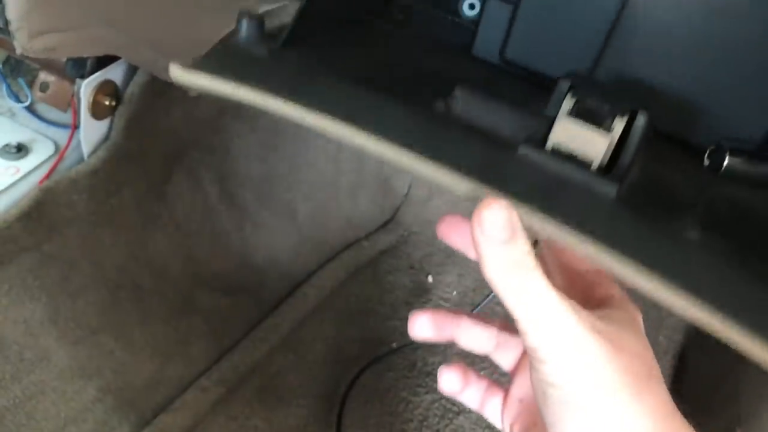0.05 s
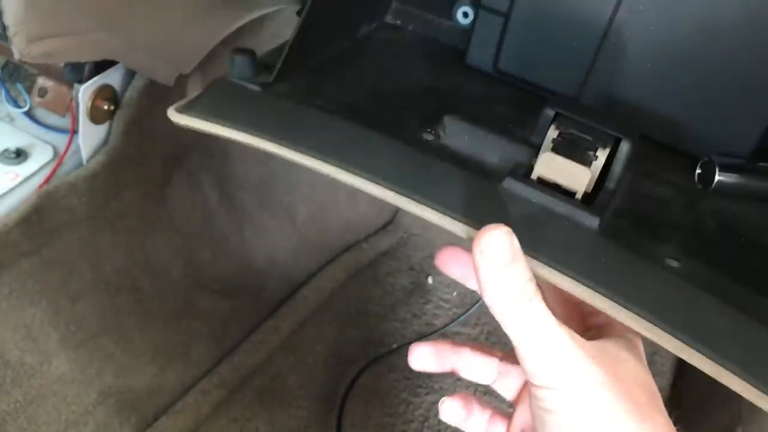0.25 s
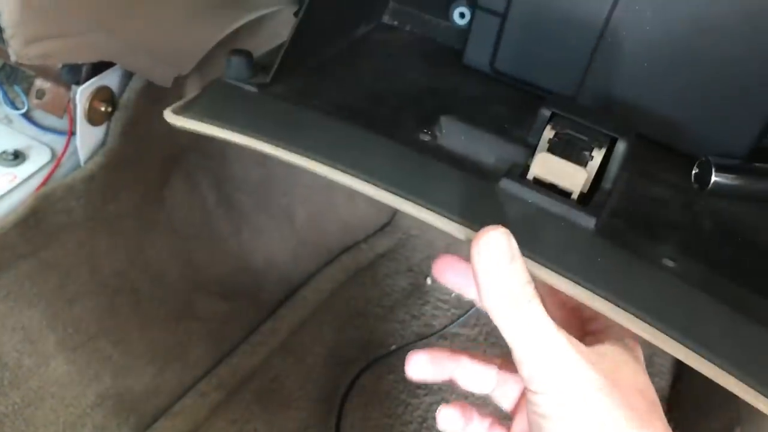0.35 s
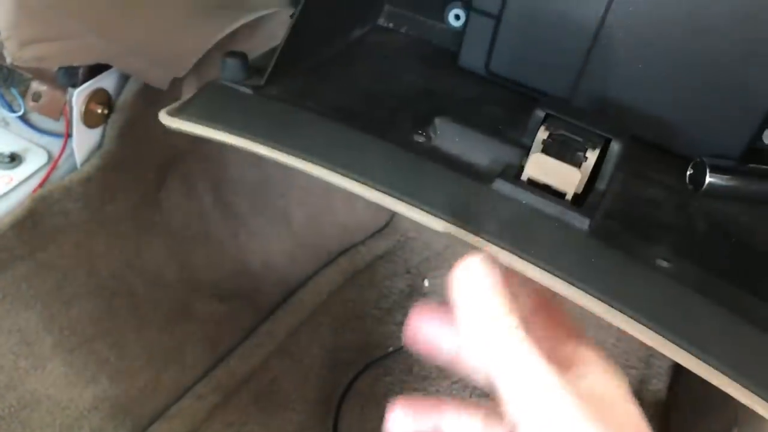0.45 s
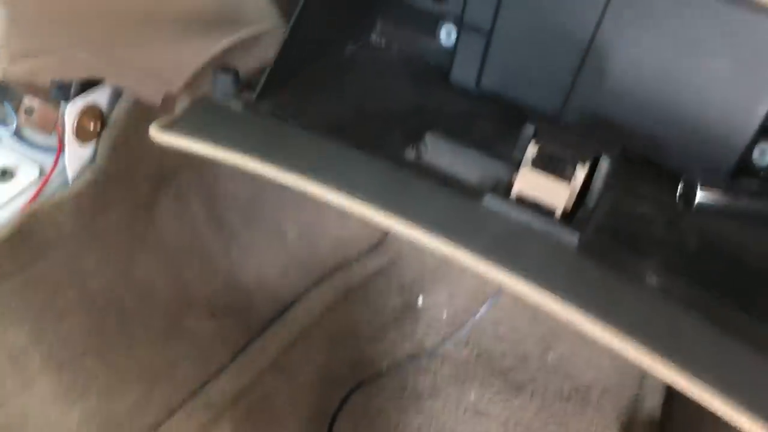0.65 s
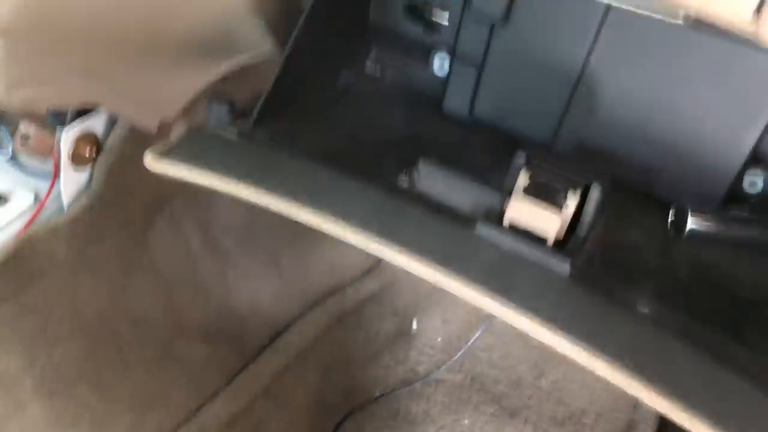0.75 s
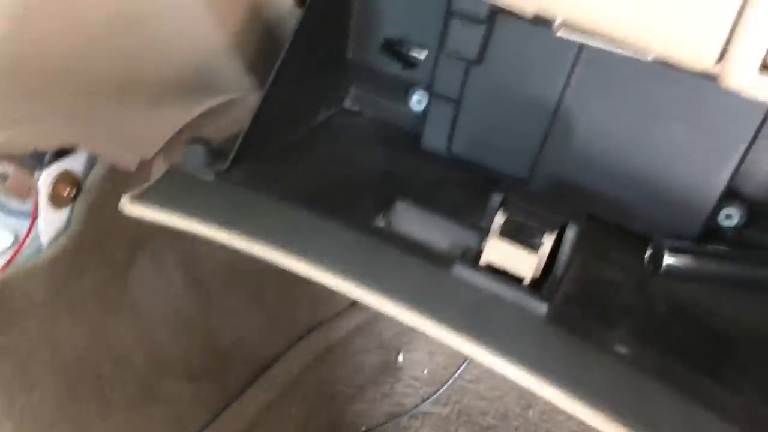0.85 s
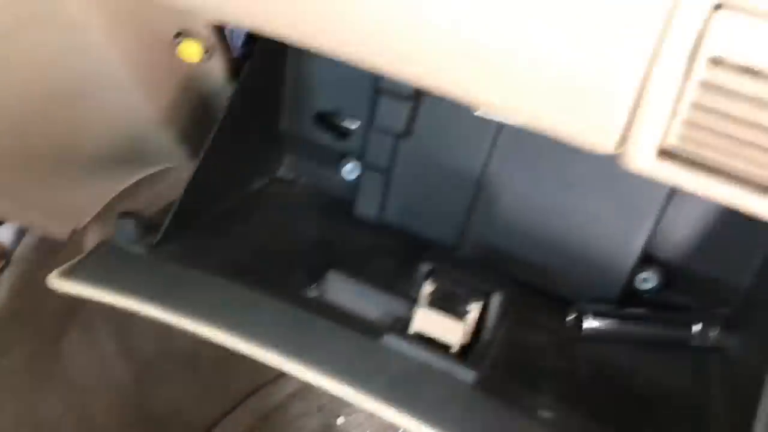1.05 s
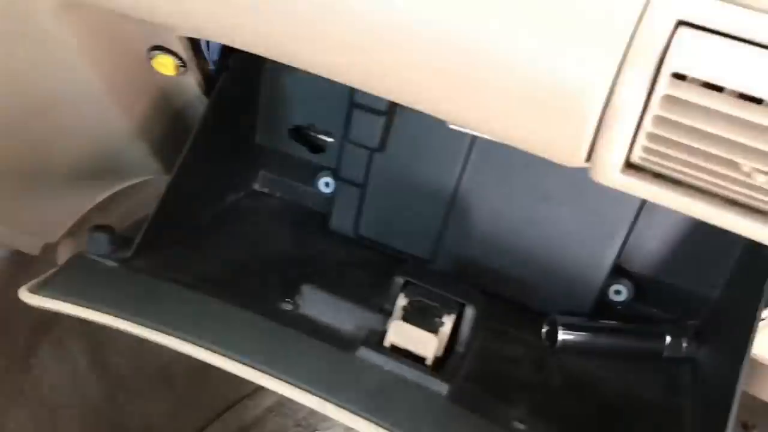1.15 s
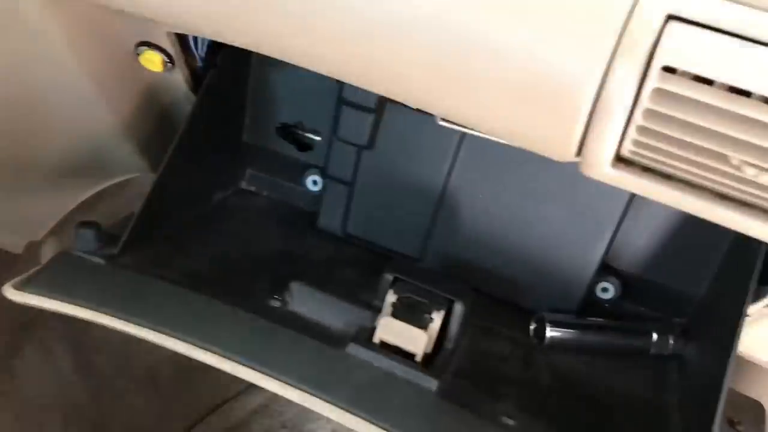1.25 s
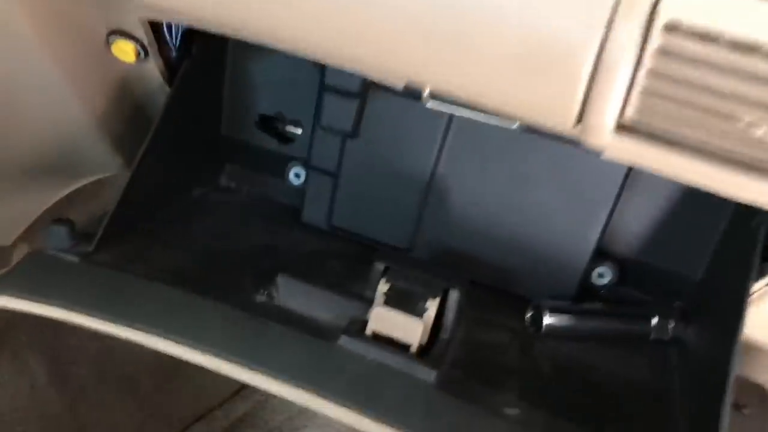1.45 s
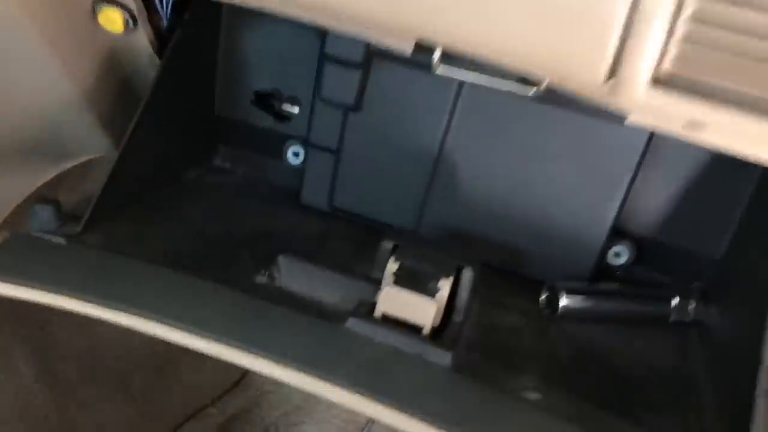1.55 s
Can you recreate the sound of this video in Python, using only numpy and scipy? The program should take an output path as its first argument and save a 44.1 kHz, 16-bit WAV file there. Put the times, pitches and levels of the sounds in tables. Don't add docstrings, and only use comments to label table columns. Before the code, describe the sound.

A car glove box latch snaps and its plastic lid drops open with a clattering thump.

```python
import sys
import numpy as np
from scipy import signal
from scipy.fft import rfft, irfft
from scipy.io import wavfile
from scipy.ndimage import uniform_filter1d

SR = 44100
rng = np.random.default_rng(int(sys.argv[2]) if len(sys.argv) > 2 else 0)


def magnitude_from_level(level_db):
    exponent = np.asarray(level_db, float) / 20
    return 10 ** exponent


def master_out(mix):
    frames = np.transpose(np.atleast_2d(mix))
    ceiling = np.clip(frames, -1, 1)
    pcm = np.round(ceiling * 32767).astype(np.int16)
    wavfile.write(sys.argv[1], SR, pcm)


N = 70560

# pitch in Hz, strength in dB per Hz.
RUMBLE_SPECTRUM = [(12, -28), (20, -11.5), (117, -2), (156, -8), (172, -10), (419, -23), (476, -38),
                   (532, -26.5), (900, -31), (1170, -61.5), (1980, -120)]
# pitch in Hz, strength in dB per Hz.
AIR_SPECTRUM = [(290, -37.5), (500, -5.5), (800, -3.5), (1160, -0.5), (1510, -6.5), (2610, -15),
                (6500, -23.5), (16000, -27.5)]
# pitch in Hz, width in Hz, level in dB.
CABIN_HUMS = [(40.36, 4.7, -54.5), (67, 34, -56.5), (110.35, 7.3, -51.5), (2130, 260, -80)]
# pitch in Hz, level in dB, time to fade by 60 dB in seconds.
PANEL_TONES = [(1702, -6.5, .016), (2000, -4.5, 0.0098), (2150, -10, 0.012), (2394, -13, 0.011),
               (2680, -12, 0.01205), (2700, -17, 0.019), (2920, -17.5, .016), (3250, -19, 0.015),
               (3930, -25.5, .014)]
# pitch in Hz, level in dB, time to fade by 60 dB in seconds.
BODY_TONES = [(150.4, -3.5, 0.11), (177.5, -19, 0.018), (250, -6, 0.027), (355, 0, 0.015),
              (456.5, -12.5, 0.1), (523, -7.5, 0.031), (690, -3, 0.015), (815, -2.5, .025),
              (1050, -10.5, 0.038), (1222, -4, 0.044), (1522, -21.5, .018)]
# pitch in Hz, strength in dB per Hz.
CRACK_SPECTRUM = [(1470, -8.5), (2500, -11), (4210, -3.5), (5110, -7), (6600, -4), (9730, -10.5),
                  (13000, -9.5), (16000, -10)]
# pitch in Hz, strength in dB per Hz.
THUD_SPECTRUM = [(150, -10), (350, 0.5), (600, -1.5), (1300, -3), (2200, -14), (3200, -26.5)]
# start in seconds, panel ring in dB, body knock in dB,
# crack in dB, crack tilt in dB per octave.
LATCH_CONTACTS = [(.0002, -51, -46.5, -54, -4), (.0262, -43.5, -51, -45.5, -5), (.1072, -45, -53, -58, -9),
                  (.1585, -57, -52, -56, -3), (.1648, -63, -41.5, -46.5, 5), (.1835, -59, -45.5, -36.5, -2),
                  (.198, -50, -45, -43.5, 0.5), (.2209, -29, -35.5, -25, 1), (.2242, -39, -34.5, -26, -5.5),
                  (.2283, -43.5, -42.5, -40.5, 8.5), (.2418, -46.5, -47, -39.5, 2.5),
                  (.851, -83, -63, -68, -10), (.963, -62, -56, -56, -4)]
# start in seconds, panel ring in dB, body knock in dB,
# crack in dB, crack tilt in dB per octave.
DROP_CONTACTS = [(.2443, -29.5, -16, -24, -11), (.2474, -7, -15, -25.5, -20.5),
                 (.2505, -19, -18, -22.5, -10.5), (.2545, -16.5, -34, -27, -13.5),
                 (.2580, -32.5, -20, -32.5, -2), (.2615, -49, -22, -27.5, -1.5),
                 (.269, -32, -37, -42.5, -6), (.277, -50, -42.5, -41.5, -1), (.288, -62, -34.5, -44.5, -3),
                 (.3202, -64, -39, -42.5, 7), (.3265, -33.5, -37.5, -39, 4.5), (.3282, -39, -34.5, -47, 2),
                 (.3318, -29, -33, -54, -8), (.3345, -32.5, -28, -63, -1), (.339, -30, -40, -65, 7),
                 (.3425, -54, -43.5, -53, -10), (.3455, -51, -35, -37, -13), (.350, -58, -32, -51, -11),
                 (.362, -58, -50, -59, -11), (.3775, -49, -38, -53, -5), (.3985, -60, -46, -54.5, 4)]
# time in seconds, rub level in dB, fizz level in dB.
SLIDE_LEVELS = [
    (.03, -84, -82),
    (.138, -65, -65),
    (.15, -50, -57),
    (.17, -49, -54),
    (.18, -48, -61.5),
    (.196, -50.5, -54.5),
    (.205, -45.5, -48.5),
    (.225, -51.5, -53),
    (.243, -41, -42),
]
# pitch in Hz, width in Hz, level in dB.
HANDLE_TONES = [(624.6, 83, 2), (705, 220, -3.5), (1187, 540, -6.5), (1820, 378, -11.5), (296, 180, -7)]
# pitch in Hz, strength in dB per Hz.
FIZZ_SPECTRUM = [(1180, -29), (2000, -4), (2910, 0), (6820, -3), (10300, -6), (15100, -9.5), (16000, -9)]
# start
# in seconds, length in seconds, peak in dB, pitch in Hz.
CHOKED_RINGS = [
    (.2437, .0032, -11, 2030),
    (.2474, .0046, -8, 1990),
    (.2515, .0042, -15, 2020),
    (.2468, .0045, -19, 1200),
    (.2455, .013, -21, 165),
                (.0262, 0.01, -50.5, 614), (0.025, 0.012, -46.5, 1210), (.2202, 0.0038, -32, 4204),
             (.221, 0.0035, -39, 2732), (.2222, 0.0077, -31, 2030), (0.2246, .009, -31, 262),
             (0.2446, 0.0065, -24.5, 3250), (.249, 0.011, -32.5, 3031), (.250, 0.01462, -23, 336),
             (.249, 0.0068, -21, 1220), (.251, 0.017, -26, 690), (0.26, 0.01, -41.5, 1902),
             (0.327, .005, -36, 2120), (0.341, 0.003, -36.5, 560), (.344, 0.0046, -37.5, 1010),
             (0.392, 0.016, -48.5, 668), (.848, 0.011, -53.5, 392)]
# time in seconds, level in dB.
WOBBLE_LEVELS = [
    (.251, -45),
    (.262, -22),
    (.296, -28),
    (.35, -30),
    (.385, -33.5),
    (.425, -42.5),
    (.462, -39.5),
    (.485, -57),
    (.52, -49.5),
    (.56, -55.5),
]
# pitch in Hz, level in dB, extra level change in dB per second.
WOBBLE_TONES = [(69.2, -2.5, 11.5), (140.2, -8.5, -5.5), (220.8, -19, -18.5)]
# time in seconds, level in dB, tilt in dB per octave (negative is duller).
SLEEVE_LEVELS = [(.84, -88.5, -1), (.90, -69.5, -8), (.96, -66, -4), (1.03, -70, -6), (1.148, -69, -6.5),
                 (1.162, -59.5, -2.2), (1.205, -60.5, 0.5), (1.235, -57, -4), (1.272, -57, 1),
                 (1.30, -65, -4.5), (1.34, -75, -5.5), (1.47, -86, 3), (1.53, -70, -2), (1.575, -67, -6),
                 (1.6, -68, 0)]
# pitch in Hz, strength in dB per Hz.
CLOTH_SPECTRUM = [(350, -19.5), (900, -8.5), (2540, -8.5), (5500, -10), (8500, -8.5), (11500, -6.5),
                  (15300, -2.5), (16000, -7.5)]
# pitch in Hz, gain in dB.
MIC_RESPONSE = [(5, -29), (26, -9.5), (36, 0.5), (9700, -1), (10400, -4), (11200, -0.5)]

RUMBLE_DB, AIR_DB = -53, -64.5
CONTACT_S, DETUNE, SCATTER_DB = 0.00063, 0.015, 2.5
CRACK_RISE_S, CRACK_T60, CRACK_TAIL_T60, CRACK_TAIL_DB = 0.0004, 0.014, 0.2, -21
THUD_DB, THUD_T60 = -7, 0.044
SLIPS_PER_S, SLIP_SPREAD_DB = 1880, 0
CREAK_S, CREAK_RISE = 0.14, 0.68
SQUEAK_S, SQUEAK_LENGTH_S, SQUEAK_HZ, SQUEAK_DB, SQUEAK_SAG = 0.105, 0.024, 2050, -60, 0.16
RING_GLIDE, RING_SKEW = 0.06, 1.3
WOBBLE_TROUGH_S = 0.2645
WOBBLE_SAG_S, WOBBLE_SAG = 0.116, 0.064
PIN_S, PIN_HZ, PIN_DB, PIN_T60 = 0.284, 3560, -50.5, 0.2
ECHO_T60, ECHO_TREBLE_T60, ECHO_SPLIT_HZ, ECHO_DB = 0.1, 0.06, 840, -17
EDGE_HZ = 15780


def evened(x):
    return x / np.sqrt(np.mean(x ** 2) + 1e-20)


def coloured(x, points):
    f, db = np.transpose(points)
    hz = np.fft.rfftfreq(len(x), 1 / SR)
    curve_db = np.interp(np.log(hz + 1), np.log(f + 1), db, left=-80)
    return evened(irfft(rfft(x) * magnitude_from_level(curve_db), len(x)))


def level(rows, column=1):
    rows = np.asarray(rows)
    return magnitude_from_level(np.interp(np.arange(N) / SR, rows[:, 0], rows[:, column], left=-120, right=-120))


def add(mix, s, sound):
    part = mix[round(s * SR):][:len(sound)]
    part += sound[:len(part)]


def resonate(x, hz, width):
    turn = np.exp(2j * np.pi * np.cumsum(hz * np.ones(len(x))) / SR)
    r = np.exp(-np.pi * width / SR)
    smooth = signal.lfilter([(1 - r) ** 2], [1, -2 * r, r * r], x / turn)
    return 2 * (turn * smooth).real


def slips(rate, spread_db):
    noise = rng.standard_normal(N)
    size = magnitude_from_level(spread_db * np.minimum(rng.exponential(1, N), 5))
    clicks = size * (rng.random(N) < rate / SR)
    return noise * (0.33 + clicks)


def cabin():
    swell = uniform_filter1d(rng.standard_normal(N), 3000)
    swell = evened(uniform_filter1d(swell, 3000))
    rumble = magnitude_from_level(RUMBLE_DB) * coloured(rng.standard_normal(N), RUMBLE_SPECTRUM)
    air = magnitude_from_level(AIR_DB + 0.86 * swell) * coloured(rng.standard_normal(N), AIR_SPECTRUM)
    hums = sum(magnitude_from_level(db) * evened(resonate(rng.standard_normal(N), hz, width)) for hz, width, db in CABIN_HUMS)
    return rumble + air + hums


def ring(tones, t, scatter):
    hz, db, t60 = np.transpose(tones)[:, :, None]
    louder = SCATTER_DB * scatter[:len(tones), None]
    sharper = DETUNE * scatter[len(tones):2 * len(tones), None]
    x = magnitude_from_level(db + louder - 60 * t / t60) * np.sin(2 * np.pi * hz * (1 + sharper) * t)
    return (x[::2].sum(0) - x[1::2].sum(0)) * (1 - np.exp(-t / CONTACT_S))


def contacts(rows, body):
    out, t = np.zeros(N), np.arange(6000) / SR
    draws = rng.standard_normal((len(rows), len(t)))
    crack_fade = magnitude_from_level(-60 * t / CRACK_T60) + magnitude_from_level(CRACK_TAIL_DB - 60 * t / CRACK_TAIL_T60)
    crack_shape = crack_fade * (1 - np.exp(-t / CRACK_RISE_S))
    thud_shape = magnitude_from_level(THUD_DB - 60 * t / THUD_T60) * (1 - np.exp(-t / CONTACT_S))
    for (s, panel_db, body_db, crack_db, tilt), noise in zip(rows, draws):
        tilted = [(f, db + tilt * np.log2(f / 4000)) for f, db in CRACK_SPECTRUM]
        crack = coloured(noise, tilted) * crack_shape
        thud = coloured(noise[::-1], THUD_SPECTRUM) * thud_shape
        knock = ring(body, t, noise[::-1]) / 2 + thud
        panel = ring(PANEL_TONES, t, noise)
        add(out, s, magnitude_from_level(panel_db) * panel + magnitude_from_level(body_db) * knock + magnitude_from_level(crack_db) * crack)
    return out


def choked_rings():
    out = np.zeros(N)
    for s, length, db, hz in CHOKED_RINGS:
        u = np.arange(0, 1, 1 / (length * SR))
        pitch = hz * (1 + RING_GLIDE * (u - 0.5))
        tone = np.sin(2 * np.pi * np.cumsum(pitch) / SR)
        add(out, s, magnitude_from_level(db) * np.sin(np.pi * u ** RING_SKEW) * tone)
    return out


def handle():
    t = np.arange(N) / SR
    drive = slips(SLIPS_PER_S, SLIP_SPREAD_DB)
    load = 1 + CREAK_RISE * np.clip(t - CREAK_S, 0, 0.08)
    rub = sum(magnitude_from_level(db) * evened(resonate(drive, hz * load, width)) for hz, width, db in HANDLE_TONES)
    u = np.clip((t - SQUEAK_S) / SQUEAK_LENGTH_S, 0, 1)
    squeak_tone = evened(resonate(drive, SQUEAK_HZ * (1 - SQUEAK_SAG * u), 300))
    squeak = magnitude_from_level(SQUEAK_DB) * np.sqrt(np.sin(np.pi * u).clip(0)) * squeak_tone
    fizz = coloured(slips(3000, 2.66), FIZZ_SPECTRUM)
    return squeak + rub * level(SLIDE_LEVELS) + fizz * level(SLIDE_LEVELS, column=2)


def wobble():
    t = np.arange(N) / SR - WOBBLE_TROUGH_S
    swing = t - WOBBLE_SAG * np.maximum(t - WOBBLE_SAG_S, 0)
    boom = 0
    for hz, db, slope in WOBBLE_TONES:
        boom = boom - magnitude_from_level(db + slope * np.clip(t, 0, 0.3)) * np.cos(2 * np.pi * hz * swing)
    return np.sqrt(2) * boom * uniform_filter1d(level(WOBBLE_LEVELS), 400)


def pin():
    out, t = np.zeros(N), np.arange(6000) / SR
    fade = magnitude_from_level(PIN_DB - 60 * t / PIN_T60) * np.minimum(t / 0.0039, 1)
    add(out, PIN_S, fade * np.sin(2 * np.pi * PIN_HZ * t))
    return out


def sleeve():
    grains = coloured(slips(8700, 1.4), CLOTH_SPECTRUM)
    hz, t, z = signal.stft(grains, SR, nperseg=256)
    times, _, slope = np.transpose(SLEEVE_LEVELS)
    tilt_db = np.interp(t, times, slope) * np.log2(hz[:, None] / 8000 + 0.1)
    return signal.istft(z * magnitude_from_level(tilt_db), SR, nperseg=256)[1][:N] * level(SLEEVE_LEVELS)


def reflections(near):
    t = np.arange(8000) / SR
    bounces = rng.standard_normal(len(t)) * (rng.random(len(t)) < 0.2) * (t > 0.003)
    low = signal.sosfilt(signal.butter(2, ECHO_SPLIT_HZ, fs=SR, output="sos"), bounces)
    tail = low * magnitude_from_level(-60 * t / ECHO_T60) + (bounces - low) * magnitude_from_level(-60 * t / ECHO_TREBLE_T60)
    return magnitude_from_level(ECHO_DB) * signal.fftconvolve(near, tail / np.linalg.norm(tail))[:N]


def scene():
    latch = contacts(LATCH_CONTACTS, BODY_TONES[2:])
    drop = contacts(DROP_CONTACTS, BODY_TONES)
    near = latch + drop + choked_rings() + pin() + handle()
    return (near + reflections(near) + wobble() + sleeve() + cabin())[None]


def band_limit(x):
    return signal.sosfilt(signal.butter(12, 16150, fs=SR, output="sos"), x)


def record(dry):
    hz = np.fft.rfftfreq(N, 1 / SR)
    mic_db = np.interp(hz, *np.transpose(MIC_RESPONSE))
    limit_db = -70 * np.clip((hz - EDGE_HZ) / 250, 0, 1)
    mix = irfft(rfft(dry) * magnitude_from_level(mic_db + limit_db), N)
    return band_limit(mix)


dry = scene()
out = record(dry)
master_out(out)
```